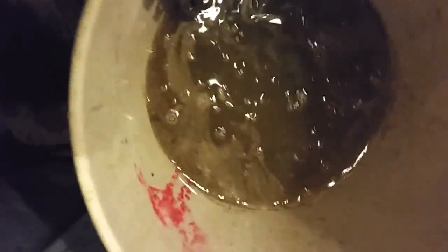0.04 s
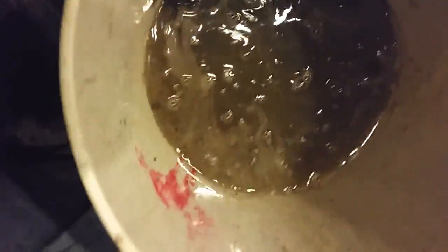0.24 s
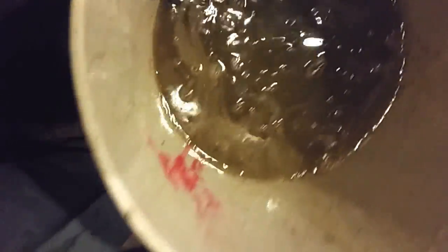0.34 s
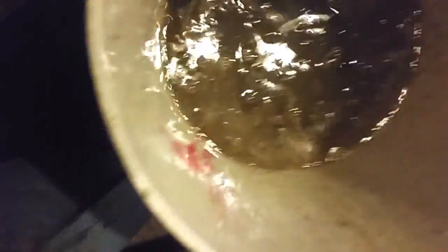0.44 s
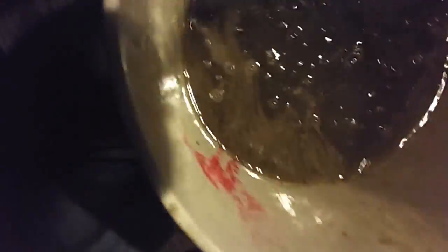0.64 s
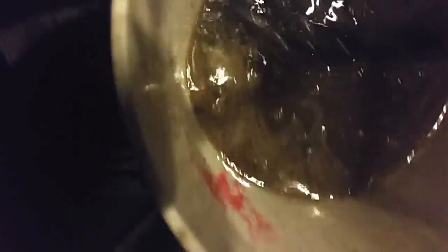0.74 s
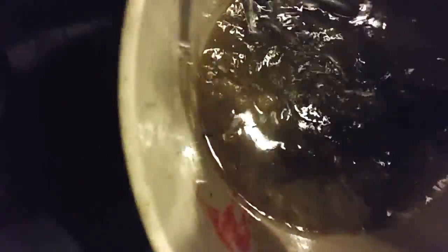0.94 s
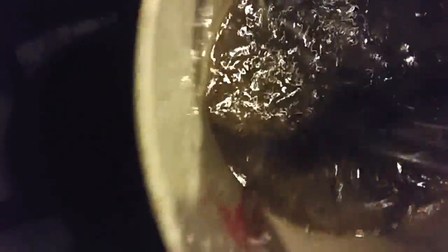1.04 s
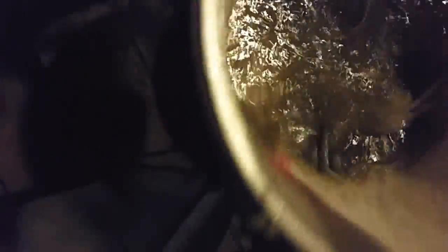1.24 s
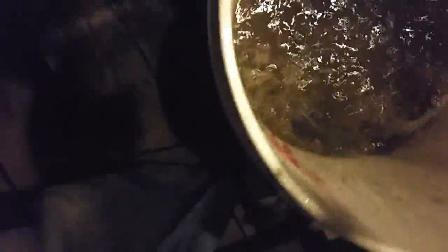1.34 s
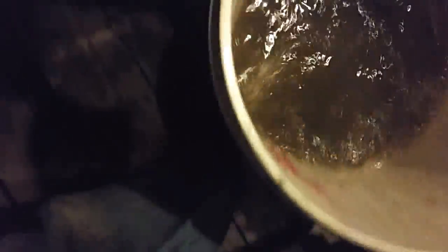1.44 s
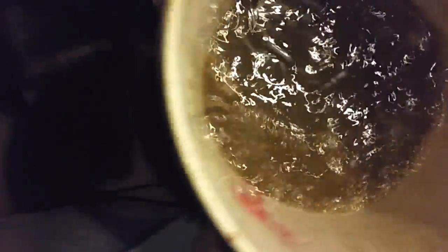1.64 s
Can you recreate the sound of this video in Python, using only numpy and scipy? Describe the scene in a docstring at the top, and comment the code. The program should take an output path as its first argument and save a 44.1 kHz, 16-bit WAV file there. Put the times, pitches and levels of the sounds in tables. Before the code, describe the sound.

A steel chain rattles close by in a plastic bucket of liquid, with sharp clicks and very high ringing. From about 0.1 seconds, links knock the hollow bucket while the liquid sloshes and bubbles, surging near 0.25, 0.5 and 0.9 seconds. Around 1.2 seconds a heap of links drops with a louder crash and a splash. A few clinks and fine drips follow, dying away by 1.7 seconds.

```python
"""Chain stirred in a bucket

A steel chain is stirred close by in a plastic bucket of murky liquid. Links click, ring
very high and knock the hollow bucket; the liquid sloshes and bubbles. A last shake drops
a heap of links with a splash, then the rattle dies away."""
import sys
import numpy as np
from scipy import signal
from scipy.fft import rfft, irfft, next_fast_len
from scipy.io import wavfile
from scipy.ndimage import uniform_filter1d

SR = 44100
rng = np.random.default_rng(int(sys.argv[2]) if len(sys.argv) > 2 else 0)


def inscribe(sig):
    """Save sig as 16-bit PCM at rate SR to the path in sys.argv[1].

    A 1-D sig is mono; a 2-D sig holds one channel per row.
    Samples are clipped to [-1, 1] before scaling.
    """
    pcm = np.round(np.clip(np.atleast_2d(sig).T, -1, 1) * 32767)
    wavfile.write(sys.argv[1], SR, pcm.astype(np.int16))


N = 74970
SCENE_T = np.arange(N) / SR
T = np.arange(SR // 4) / SR  # one event

# liquid and bucket motion: t/s, relative slosh level/dB, relative drumming level/dB
SLOSH_LEVELS = [(0, -37.5, -39), (0.15, -32, -29.5), (0.26, -29.5, -29), (0.39, -37, -38.5),
                (0.48, -39.5, -48), (0.53, -28, -28), (0.67, -36.5, -37.5), (0.76, -32.5, -41),
                (0.87, -38, -43.5), (0.94, -27, -29.5), (1.03, -31.5, -40), (1.12, -42, -44),
                (1.23, -27.5, -34.5), (1.31, -35, -35.5), (1.38, -31.5, -38.5), (1.45, -42.5, -54.5),
                (1.57, -41.5, -47), (1.7, -54.5, -63)]
# large bubbles: t/s, f/Hz, relative level/dB
LARGE_BUBBLES = [(.097, 241, -13.5), (0.145, 1460, -8.5), (.238, 208, -14), (0.25, 1220, -5.5),
                 (.256, 930, -4), (.523, 185.5, -9.5), (.528, 570, -8), (.925, 1150, -7.5),
                 (.929, 228, -6.5), (.931, 710, -7), (.976, 193, -13.5), (1.0755, 696, -10.5),
                 (1.0871, 3050, -8), (1.148, 398, -7), (1.371, 298, -11.5)]
# chain on bucket: t/s, clack/dB, boom/dB
BUCKET_HITS = [(.111, -26.5, -39), (.144, -21.5, -40), (.208, -23.5, -21), (.248, -23.5, -32),
               (.305, -27, -31), (.33, -22, -31), (.414, -29.5, -23.5), (.524, -26, -39), (.925, -23, -29),
               (.973, -33, -24), (1.074, -25.5, -22.5), (1.147, -19.5, -52), (1.183, -18.5, -28),
               (1.207, -21.5, -19), (1.367, -31, -37)]
# chain motion: t/s, relative clatter level/dB, relative ring level/dB
CHAIN_LEVELS = [(0, -38, -21.5), (0.09, -36.5, -45), (0.15, -27.5, -20.5), (0.21, -28.5, -15.5),
                (0.3, -26, -18), (0.37, -34, -17), (0.42, -32, -22.5), (0.47, -35, -33), (0.53, -27, -26),
                (0.62, -31, -27.0), (0.79, -28, -21), (0.86, -36.5, -46), (0.99, -26, -23),
                (1.11, -42, -27), (1.2, -20, -10.5), (1.38, -42, -44), (1.53, -42, -58), (1.68, -59.5, -94)]
# link on link: t/s, click/dB, ring/dB, factor on mode t60
LINK_HITS = [(.0575, -17.5, -25, 1.3), (0.1032, -28, -13, 1.6), (.189, -11, -36, 1.5),
             (0.213, -15, -12, 1.4), (0.25, -16, -14, 1.4), (0.281, -30, -28, 1), (0.3322, -13.5, -30, .6),
             (0.348, -22, -32, .8), (0.3641, -12.5, -10.5, 1.8), (0.441, -22, -15.5, 1.6),
             (.492, -18, -17, 1.4), (0.5206, -13, -14.5, .7), (0.5503, -18, -28, .4),
             (0.8099, -13.5, -19, .5), (0.847, -18, -29, .8), (0.8679, -16, -39, .5),
             (0.8929, -14, -17, .4), (0.9238, -10.5, -22, .4), (0.9721, -11.5, -28, .6),
             (0.985, -10.5, -11.5, .4), (1.03, -24, -30, .4), (1.0444, -16.5, -12.5, .5),
             (1.0945, -18, -17.5, .7), (1.125, -15, -26, .6), (1.146, -12.5, -9, 1.2), (1.182, -6, -21, .8),
             (1.209, -31, -13.5, 1), (1.311, -18.5, -23, .6), (1.326, -30, -18.5, .7),
             (1.359, -12.5, -31, .4), (1.369, -13, -37, .4), (1.391, -18.5, -35, .5), (1.41, -21, -31, 1.4),
             (1.431, -36, -19, 1.4), (1.4828, -19.5, -35, .5), (1.4988, -22, -37, .4),
             (1.561, -28.5, -80, .5)]
# position of the ringing links: t/s, left minus right/dB
LINK_PAN = [(.8, 1.5), (1.0, -5.5)]

# free modes: f/Hz, level/dB, t60/s
BUCKET_MODES = [(161.6, -8.5, 0.068), (186, -2.5, 0.11), (228.6, -1.5, 0.095), (268, -3.5, 0.086),
                (343, -7, 0.074)]
LINK_MODES = [(7450, -20, .025), (12620, -16, .015), (13700, -10, .015), (14220, 0, .06), (14860, -1, .05),
              (15300, -9, .025), (15600, -3, .04)]
# bucket wall resonances: f/Hz, width/Hz, relative level/dB
WALL_RESONANCES = [(354, 160, 3), (603, 190, -4), (765, 24.4, 5), (996, 45, 1.5), (1240, 41, 8)]
# echo in the bucket: f/Hz, t60/s
ECHO_DECAY = [(200, 0.055), (1000, 0.058), (5000, 0.083), (15000, 0.013)]
# stereo image of the noise: f/Hz, left-right correlation
CORRELATION = [(30, -0.92), (130, 1), (500, 0.56), (1000, 0.000058)]

# noise spectra: f/Hz, relative density/dB
FLOOR_SPECTRUM = [(25, -12), (150, 10), (800, -13), (8000, -3), (16000, -52)]
CHURN_SPECTRUM = [(25, -36), (55, -24), (110, -8), (200, -0.5), (430, -5), (780, 2), (1500, -9),
                  (3000, -3.5), (9000, -45)]
CLACK_SPECTRUM = [(90, -28), (200, -5), (320, 0.5), (1300, -1.5), (5000, -15), (12000, -14.5)]
HEAP_SPECTRUM = [(30, -22), (70, -2), (300, 9.5), (1200, -31), (3500, 2), (9000, -5), (11000, -1.5),
                 (16000, 4)]
SPLASH_SPECTRUM = [(500, -42), (1000, -2.5), (3600, 5), (9000, -20)]
CLATTER_SPECTRUM = [(200, -1), (900, -0.5), (2400, -0.5), (6400, 1), (7500, 8.5), (10500, -2), (16000, -3)]
CLICK_SPECTRUM = [(200, -15), (2000, 0.5), (6300, 4.5), (7600, 10.5), (10000, -0.5), (16000, -1.5)]
EDGE_SPECTRUM = [(8000, -36), (12000, -8), (14500, 2)]

LINK_SPREAD, LINK_SCATTER_DB = 0.008, 2.5  # per blow: relative pitch, mode level


def amp(db):
    """dB to gain."""
    return 10 ** (np.asarray(db) / 20)


def unit(x):
    """Scale to rms 1."""
    return x / np.sqrt(np.mean(x ** 2) + 1e-20)


def along(points, hz):
    """Interpolate on a log frequency axis."""
    f, values = np.transpose(points)
    return np.interp(np.log(hz + 1), np.log(f + 1), values)


def curves(rows):
    """Per-sample curve of each column after the time."""
    times, *columns = np.transpose(rows)
    return [np.interp(SCENE_T, times, column) for column in columns]


def filtered(x, response):
    """Apply a frequency response."""
    size = next_fast_len(x.shape[-1] + 8192)
    return irfft(rfft(x, size) * response(np.fft.rfftfreq(size, 1 / SR)), size)[..., :x.shape[-1]]


def noise(spectrum, size=N):
    """Shaped, partly correlated stereo noise; rms 1."""
    def response(hz):
        angle = np.arccos(np.clip(along(CORRELATION, hz), -1, 1)) / 2
        return amp(along(spectrum, hz)) * [np.cos(angle), np.sin(angle)]
    mid, side = filtered(rng.standard_normal((2, size)), response)
    return unit(np.array([mid + side, mid - side]))


def patchy(x, depth_db):
    """Random colour from moment to moment."""
    bins = signal.stft(x, nperseg=256)[2]
    field = uniform_filter1d(rng.standard_normal(bins.shape[1:]), size=7, axis=0)
    field = unit(uniform_filter1d(field, size=4, axis=1))
    return signal.istft(bins * amp(depth_db * (field - depth_db / 9)), nperseg=256)[1][:, :N]


def add(out, start_s, sound):
    """Mix in at start_s."""
    i = int(np.clip(round(start_s * SR), 0, N - 1))
    out[:, i:i + sound.shape[-1]] += sound[..., :N - i]


def fade(attack_s, t60_s):
    """Quick rise, exponential decay."""
    return (1 - np.exp(-T / attack_s)) * amp(-60 * T / t60_s)


def surge(start_s, attack_s, hold_s, fall_db_per_s):
    """Linear rise; decay begins hold_s after the start."""
    t = SCENE_T - start_s
    return np.clip(t / attack_s, 0, 1) * amp(-fall_db_per_s * np.maximum(t - hold_s, 0))


def ring(modes, spread, scatter_db, apart_rad):
    """One blow on damped modes, phase differing by channel; rms 1 over the first 10 ms."""
    out = np.zeros((2, len(T)))
    for hz, db, t60_s in modes:
        detune, level, phase = rng.standard_normal(3)
        offset_rad = apart_rad * phase * np.array([[1], [-1]])
        decay = amp(db + scatter_db * level - 60 * T / t60_s)
        out += decay * np.sin(2 * np.pi * hz * (1 + spread * detune) * T + offset_rad)
    return out / np.sqrt(np.mean(out[:, :SR // 100] ** 2, axis=1, keepdims=True))


def impulses(per_s, scatter_db):
    """Irregular impulses of uneven strength."""
    slots = np.arange(1500)
    at = (np.maximum(slots + 2 * rng.random(len(slots)) - 2, 0) / per_s * SR).astype(int)
    strength = amp(scatter_db * rng.uniform(-1.65, 1, len(slots)))
    return np.bincount(at[at < N], strength[at < N], N)


def grains(per_s, scatter_db, t60_s):
    """Envelope of short decaying bursts; rms 1."""
    power = signal.fftconvolve(impulses(per_s, scatter_db) ** 2, amp(-120 * T / t60_s))[:N]
    return unit(np.sqrt(np.abs(power)))


def jostle(hits, sounds):
    """Each impulse triggers one of the sounds at random; rms 1."""
    which = rng.integers(len(sounds), size=N)
    return unit(sum(signal.fftconvolve((hits * (which == k))[None], sound, axes=1)[:, :N]
                    for k, sound in enumerate(sounds)))


def background():
    """Faint steady noise."""
    return amp(-78) * noise(FLOOR_SPECTRUM)


def bucket_echo(x):
    """Short echo in the bucket; tails crossfade as the chain moves."""
    places = 6
    hz, t, bins = signal.stft(rng.standard_normal((places, 2, SR // 4)), SR, nperseg=256)
    tails = signal.istft(bins * amp(-60 * t / along(ECHO_DECAY, hz)[:, None]), SR, nperseg=256)[1]
    shares = np.maximum(1 - np.abs(np.linspace(0, places - 1, N) - np.arange(places)[:, None]), 0)
    return sum(signal.fftconvolve(x * np.sqrt(share), tail / np.linalg.norm(tail[0]), axes=1)[:, :N]
               for share, tail in zip(shares, tails))


def wall(x, gain_db):
    """The bucket wall adds its resonances."""
    def response(f):
        return sum(amp(db) * 1j * f * width / (hz * hz - f * f + 1j * f * width)
                   for hz, width, db in WALL_RESONANCES)
    return x + amp(gain_db) * filtered(x, response)


def bubble(hz, cycles, rise):
    """A bubble rings briefly, rising in pitch."""
    life_s = cycles / hz
    tone = np.sin(2 * np.pi * hz * (T + rise * T ** 2 / (2 * life_s)))
    pan = amp(rng.normal(0, 0.6) * np.array([[1], [-1]]))
    return tone * fade(attack_s=0.5 / hz, t60_s=life_s) * pan


def fizz(per_s, cycles):
    """Swarm of small bubbles."""
    births = impulses(per_s, scatter_db=7)
    return jostle(births, [bubble(hz, cycles, rise=0.1) for hz in np.geomspace(1600, 6000, 32)])


def trickle():
    """After the splash, fine drops run off the links."""
    envelope = surge(start_s=1.301, attack_s=0.07, hold_s=0.28, fall_db_per_s=199)
    return amp(-46.5) * envelope * fizz(per_s=850, cycles=9)


def plops():
    """Large air pockets gulp through the liquid."""
    out = np.zeros((2, N))
    for start_s, hz, db in LARGE_BUBBLES:
        add(out, start_s, amp(db - 4) * bubble(hz, cycles=12.4, rise=0.072))
    return out


def slosh():
    """Stirred liquid churns and bubbles."""
    slosh_db, _ = curves(SLOSH_LEVELS)
    churn = noise(CHURN_SPECTRUM) * grains(per_s=170, scatter_db=8.5, t60_s=0.085)
    churn = unit(wall(churn, gain_db=3.5))
    bubbles = [bubble(hz, cycles=23, rise=0.039) for hz in np.geomspace(450, 2400, 24)]
    bubbling = jostle(impulses(per_s=110, scatter_db=2.5), bubbles)
    return amp(slosh_db - 1.5) * churn + amp(slosh_db - 7.5) * bubbling


def groan():
    """The dragging chain draws one rough, sagging tone from the bucket."""
    start_s, length_s, start_hz, sag_hz_per_s = 0.56, 0.21, 235.4, 210
    t = SCENE_T - start_s
    swell = np.sin(np.pi * np.clip(t / length_s, 0, 1))
    tone = np.sin(2 * np.pi * np.cumsum(start_hz - sag_hz_per_s * t) / SR)
    return amp(-31) * swell * unit(tone * grains(per_s=150, scatter_db=7.5, t60_s=0.054))


def drumming():
    """Links dragged over the bottom make the bucket drum and groan."""
    _, drum_db = curves(SLOSH_LEVELS)
    envelope = fade(attack_s=0.0027, t60_s=0.73)
    taps = [ring(BUCKET_MODES, spread=0.023, scatter_db=0.5, apart_rad=0.13) * envelope
            for _ in range(8)]
    drag = groan() + amp(drum_db - 1) * jostle(impulses(per_s=150, scatter_db=7), taps)
    return drag * amp([[1.2], [-1.2]])


def knocks():
    """Chain strikes plastic: dull clack, hollow boom."""
    clacks, booms = np.zeros((2, N)), np.zeros((2, N))
    for start_s, clack_db, boom_db in BUCKET_HITS:
        clack = noise(CLACK_SPECTRUM, len(T))
        boom = ring(BUCKET_MODES, spread=0.03, scatter_db=-0.5, apart_rad=0.22)
        add(clacks, start_s, amp(clack_db) * clack * fade(attack_s=0.00089, t60_s=0.07))
        add(booms, start_s, amp(boom_db) * boom * fade(attack_s=0.0048, t60_s=1.0))
    return wall(clacks, gain_db=0.5) + booms * amp([[1.2], [-1.2]])


def heap():
    """A heap of links lands and throws up a fizzing splash."""
    crash = noise(HEAP_SPECTRUM) * grains(per_s=210, scatter_db=2, t60_s=0.03)
    crash *= surge(start_s=1.117, attack_s=0.017, hold_s=0.14, fall_db_per_s=182)
    splash = amp(-0.5) * noise(SPLASH_SPECTRUM) + amp(-6.5) * fizz(per_s=500, cycles=11)
    splash *= surge(start_s=1.146, attack_s=0.002, hold_s=0.038, fall_db_per_s=234)
    return patchy(amp(-19) * crash + amp(-21) * splash, depth_db=3) * amp([[-1], [1]])


def rattle():
    """Links slide over each other in hundreds of small contacts."""
    clatter_db, ring_db = curves(CHAIN_LEVELS)
    clatter = noise(CLATTER_SPECTRUM) * grains(per_s=320, scatter_db=10, t60_s=0.063)
    clatter = patchy(clatter, depth_db=1.5)
    envelope = fade(attack_s=0.0024, t60_s=0.38)
    links = [ring(LINK_MODES, LINK_SPREAD, LINK_SCATTER_DB, apart_rad=1.57) * envelope
             for _ in range(48)]
    ringing = jostle(impulses(per_s=400, scatter_db=6), links)
    return amp(clatter_db - 1) * clatter + amp(ring_db - 0.5) * ringing


def clinks():
    """Two links collide: dry click, bright edge, high ring, cut short when they press together."""
    clicks, tones = np.zeros((2, N)), np.zeros((2, N))
    snap = fade(attack_s=0.0003, t60_s=0.018)
    envelope = fade(attack_s=0.0006, t60_s=0.25)
    for start_s, click_db, ring_db, t60_factor in LINK_HITS:
        modes = [(hz, db, t60_s * t60_factor) for hz, db, t60_s in LINK_MODES]
        tone = ring(modes, LINK_SPREAD, LINK_SCATTER_DB, apart_rad=1.5) * envelope
        click = noise(CLICK_SPECTRUM, len(T)) * snap
        edge = amp(1) * noise(EDGE_SPECTRUM, len(T)) * snap
        add(clicks, start_s, amp(click_db) * click)
        add(tones, start_s, amp(ring_db) * (tone + edge))
    pan_db, = curves(LINK_PAN)
    return patchy(clicks, depth_db=2.5) + tones * amp(np.array([pan_db, -pan_db]) / 2)


def scene():
    """Chain, bucket and liquid, with echo, over the background."""
    direct = clinks() + rattle() + heap() + knocks() + drumming() + slosh() + plops() + trickle()
    return direct + amp(-6) * bucket_echo(direct) + background()


def record(dry):
    """Brick-wall low-pass."""
    return filtered(dry, lambda hz: hz < 15800)


dry = scene()
out = record(dry)
inscribe(out)
```